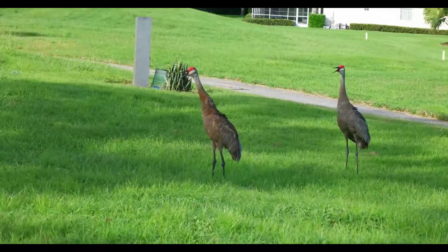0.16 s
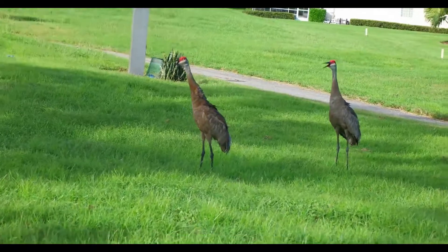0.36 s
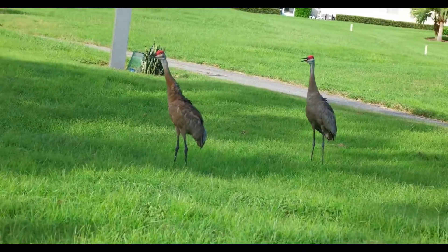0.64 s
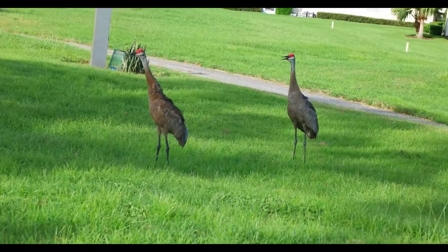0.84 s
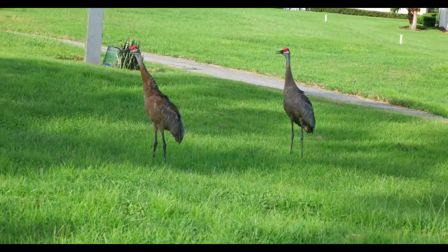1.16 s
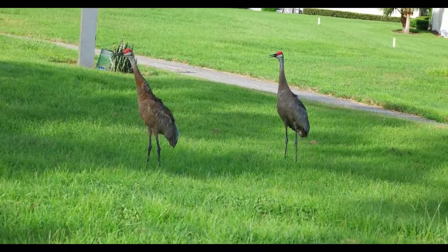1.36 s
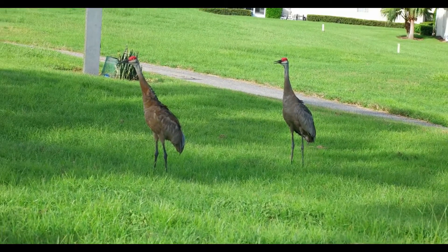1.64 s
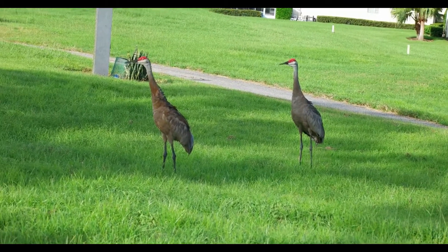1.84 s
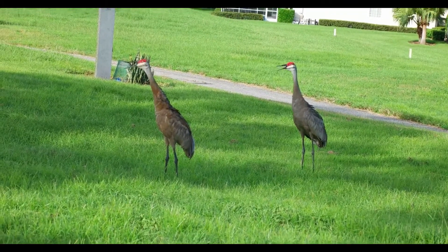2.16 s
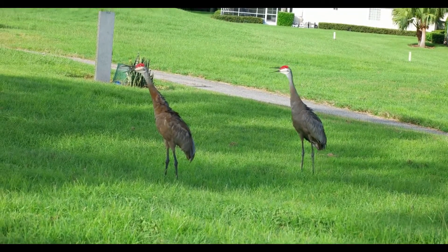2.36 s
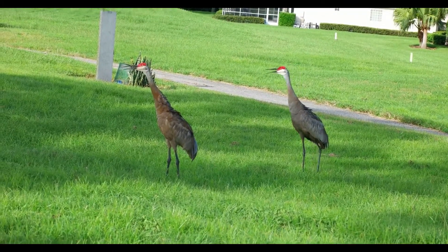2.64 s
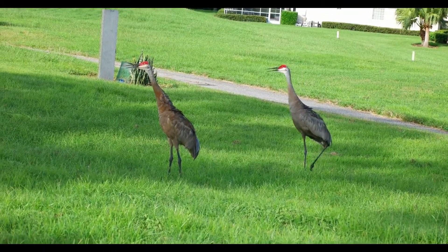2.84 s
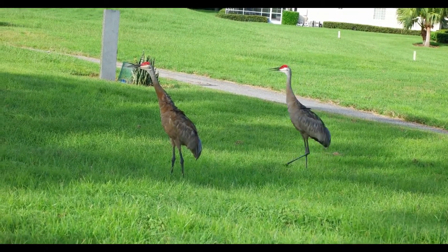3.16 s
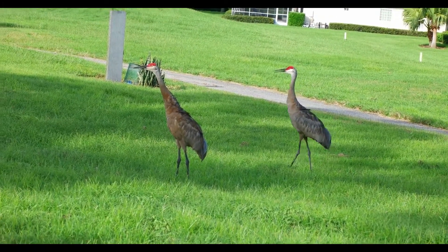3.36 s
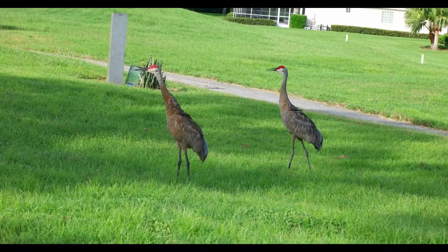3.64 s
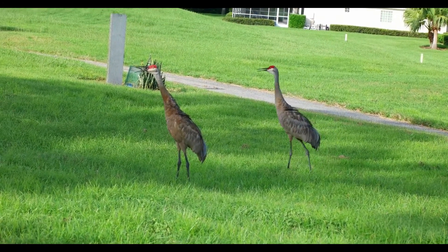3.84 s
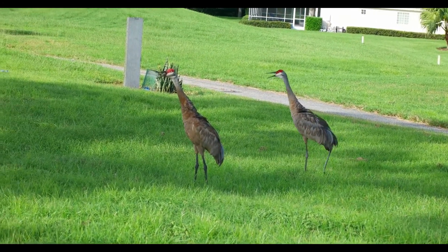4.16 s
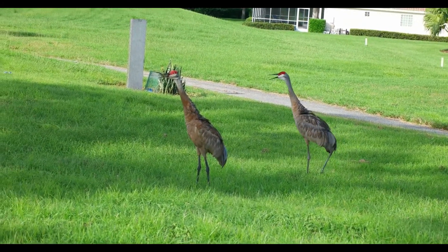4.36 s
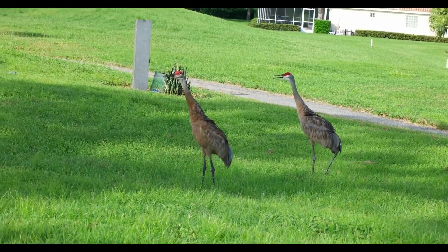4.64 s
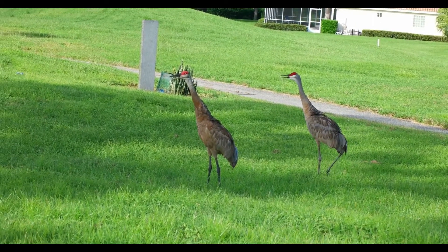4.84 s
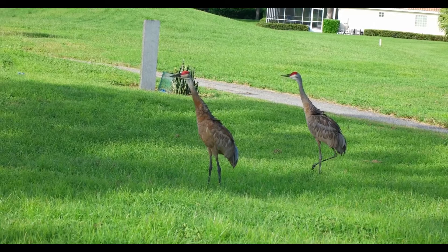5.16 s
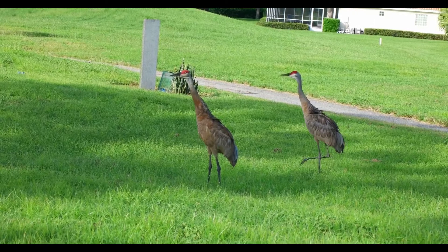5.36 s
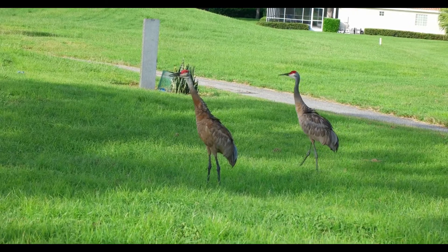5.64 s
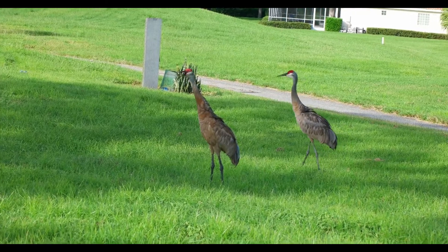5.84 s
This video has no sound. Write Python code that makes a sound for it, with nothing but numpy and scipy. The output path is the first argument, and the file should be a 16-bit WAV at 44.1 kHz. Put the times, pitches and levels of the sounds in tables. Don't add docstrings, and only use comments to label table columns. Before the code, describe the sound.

A stereo outdoor scene on a lawn between houses. At once a tiny rising honk is heard, then from 0.12 to 0.5 s a higher crane fires a very loud, hollow rattle of about eight pulses, roughly sixteen a second, resonant and breathy. A lower crane honks at 0.15 s and rattles from 0.27 to 0.7 s, interleaving. The first blows overload the microphone with a dull thud. A house echo swells and decays over soft broadband suburban rush; faint falling whistles come near 1.7 s. A leaping honk at 2.04 s opens the second duet, lasting to 2.85 s, with a distant slap echo. A thin high bird note sounds at 3.2 s. The third, weaker duet runs from 3.8 to 4.6 s. Two tiny distant calls come near 5.5 s, then a honk at 5.8 s and two fading high pulses from 5.92 s end it abruptly. Overall level steadily fades.

```python
import sys
import numpy as np
from scipy import signal
from scipy.fft import rfft, irfft, next_fast_len
from scipy.io import wavfile
from scipy.ndimage import uniform_filter1d, map_coordinates

SR = 44100
rng = np.random.default_rng(int(sys.argv[2]) if len(sys.argv) > 2 else 0)


def to_linear_factor(level_db):
    exponent = np.asarray(level_db, float) / 20
    return 10 ** exponent


def persist_wave(psi):
    counts = np.round(np.clip(psi, -1, 1) * 32767).astype(np.int16)
    wavfile.write(sys.argv[1], SR, np.atleast_2d(counts).T)


N = 264644
T = np.arange(N) / SR
FADE = 1 - T / 8.0


def unit(x):
    return x / np.sqrt(np.mean(x ** 2) + 1e-20)


def along(points, hz):
    f, v = np.transpose(points)
    return np.interp(np.log(hz + 1), np.log(f + 1), v)


def wobble(rate, size):
    knots = rng.standard_normal(int(size * rate / SR) + 4)
    return map_coordinates(knots, [np.arange(size) * rate / SR])


def resonance(f, center, width):
    return 1j * f * width / (center ** 2 - f * f + 1j * f * width)


def filtered(x, response):
    m = next_fast_len(N + SR // 2)
    return irfft(rfft(x, m) * response(np.fft.rfftfreq(m, 1 / SR)), m)[..., :N]


def add(track, s, x):
    part = track[max(round(s * SR), 0):][:len(x)]
    part += x[:len(part)]


# frequency in Hz, level in dB per Hz.
RUSH = [(12, -56), (20, -26), (53, -9), (230, -7), (264, -12), (476, -3), (548, -7), (858, -5), (1100, -11),
        (1500, -11), (10100, -31), (15000, -35), (16300, -47)]
# frequency in Hz, side minus mid level in dB.
RUSH_SIDE = [(60, -15), (150, -11), (380, -5), (950, -2), (2380, 0), (5980, 0), (15000, 0)]
# frequency in Hz, level in dB.
HUM = [(238, -71), (471, -67), (587, -70)]


def air():
    z = signal.stft(rng.standard_normal((2, N + 512)), nperseg=512)[2]
    patches = rng.standard_normal(z.shape[1:])
    patches = uniform_filter1d(uniform_filter1d(patches, 6, 0), 14, 1)
    pair = signal.istft(z * to_linear_factor(1.2 * unit(patches)), nperseg=512)[1][:, :N]
    mid, side = filtered(pair, lambda f: to_linear_factor(along(RUSH, f) + [0 * f, along(RUSH_SIDE, f)]))
    sway, drift = 2.5 * wobble(4, size=N), .6 * wobble(6, size=N)
    hum = sum(to_linear_factor(db + sway) * np.sin(2 * np.pi * hz * T + drift) for hz, db in HUM)
    earlier_echo_db = 9 * np.exp(-T / .25)
    level = to_linear_factor(-55.5 + earlier_echo_db + .7 * wobble(1.5, size=N)) / np.std(mid)
    return level * np.array([mid + side, mid - side]) + hum


# start in seconds, length in seconds, first pitch in Hz, last pitch in Hz, level in dB.
FAR_NOTES = [
    (1.65, .28, 3540, 3060, -71),
    (1.84, .14, 3420, 3190, -71),
    (3.24, .175, 7700, 8000, -78),
    (5.475, .075, 1010, 1150, -64),
    (5.545, .06, 775, 735, -65),
]
FAR_WAVER = [.005, .005, .03, .02, .02]


def far_birds():
    out = np.zeros(N)
    edge_db = 12
    for (s, length, first_hz, last_hz, db), waver in zip(FAR_NOTES, FAR_WAVER):
        u = np.linspace(0, 1, round(length * SR))
        glide = first_hz + (last_hz - first_hz) * u
        pitch = glide * (1 + waver * wobble(300, size=len(u)))
        level = db + 3 - edge_db * (2 * u - 1) ** 4 + 2.5 * wobble(40, size=len(u))
        add(out, s, to_linear_factor(level) * np.sin(2 * np.pi * np.cumsum(pitch) / SR))
    return out


def reverberation(x, start, length, decays, swell):
    hz, t, z = signal.stft(rng.standard_normal((2, round(length * SR))), SR, nperseg=256)
    envelope = (1 - np.exp(-t / swell)) * to_linear_factor(-60 * t / along(decays, hz)[:, None])
    tail = signal.istft(z * envelope, SR, nperseg=256)[1]
    tail = .5 * tail[:1] + .8 * tail
    delayed = np.pad(x, (round(start * SR), 0))[None]
    return signal.fftconvolve(delayed, tail / np.linalg.norm(tail[0]), axes=1)[:, :N]


def lawn(voices):
    return to_linear_factor(-30) * reverberation(voices, .008, .15, [(800, .12), (3000, .06)], swell=.003)


# frequency in Hz, gain in dB.
WALLS = [(400, -8), (650, 3), (850, -5), (1100, -1), (1400, 11), (2100, 4), (3000, 6), (6000, 8),
         (12000, 13)]
# frequency in Hz, t60 in seconds.
HOUSE_DECAY = [(300, .8), (900, 1.05), (3000, 1.15), (8000, .7), (15000, .5)]


def house_wash(voices):
    colored = filtered(voices, lambda f: to_linear_factor(along(WALLS, f)))
    return to_linear_factor(-28.5) * reverberation(colored, .08, 1.2, HOUSE_DECAY, swell=.2)


# frequency in Hz, gain in dB.
SLAP_COLOR = [(700, -30), (1100, -14), (2200, -1), (2900, 5), (5000, 2), (6500, -1), (10000, -26)]
# time in seconds, level in dB.
SLAP_LEVEL = [(.7, -37), (2.3, -22), (2.8, -31), (4.3, -20), (4.45, -30)]


def far_slap(low):
    toward_wall = low * to_linear_factor(np.interp(T, *np.transpose(SLAP_LEVEL)))
    colored = filtered(toward_wall, lambda f: to_linear_factor(along(SLAP_COLOR, f)))
    return reverberation(colored, .492, .02, [(1000, .015)], swell=.001)


# frequency in Hz, level in dB.
BREATH = [(500, -40), (1000, -4), (1300, -6), (1700, 0), (2400, 1), (2850, -12), (3400, -2), (4500, -2),
          (5300, -10), (6600, -8), (10000, -19), (16000, -42)]


def breath():
    return unit(filtered(rng.standard_normal(N), lambda f: to_linear_factor(along(BREATH, f))))


def voiced(hz, throat, envelope, steep, count=14):
    k = np.arange(1, count + 1)[:, None]
    phase = 2 * np.pi * (k * np.cumsum(hz) / SR + rng.random((count, 1)))
    swell = envelope ** (1 + steep * np.sqrt(k - 1))
    return np.sum(to_linear_factor(along(throat, k * hz)) * swell * np.sin(phase), axis=0)


def rattle(pulses, blow, rebound, throat):
    rise, hold, t60, sag, first, second, breath_db, away = blow
    gap_s, *rebound_db = rebound
    t = np.arange(SR // 60) / SR
    attack = np.sin(np.pi / 2 * np.clip(t / rise, 0, 1)) ** 1.5
    shape = attack * to_linear_factor(-60 * (np.maximum(t - rise - hold, 0) / t60) ** 2)
    gust = (1 - np.exp(-t / .0004)) * to_linear_factor(-60 * t / .023)
    arch = (1 - sag * ((t - .0045) / .004) ** 2).clip(.75, 1)
    tone, puff, rasp = np.zeros((3, N))
    times = np.transpose(pulses)[0]
    new_rattle = np.diff(times, prepend=-1) > .5
    into = times - np.maximum.accumulate(times * new_rattle)
    scatter = rng.standard_normal((len(pulses), 3))
    for (s, db, hz), tired_s, chance in zip(pulses, into, scatter):
        gap = gap_s + .0006 * chance[0]
        growth_db = tired_s * np.array(rebound_db[2:])
        first_db, second_db = np.minimum(rebound_db[:2] + growth_db + 1.5 * chance[1:], -1)
        add(tone, s, to_linear_factor(db - .3) * voiced(1.025 * hz * arch, throat, shape, steep=.35))
        add(puff, s, to_linear_factor(db + breath_db - away * s + 1.5) * gust)
        loose_beats = [(-.0055, .9, -26), (gap, first, first_db),
                       (2 * gap, second, second_db), (3 * gap, second, second_db - 12)]
        for lag, ratio, rel_db in loose_beats:
            pitch = hz * ratio * (1 + .05 * wobble(300, size=len(t)))
            beat = voiced(pitch, throat, shape, steep=.08, count=4)
            add(tone, s + lag, to_linear_factor(db - 2.5 + rel_db) * beat)
            rasp_db = db + .8 * rel_db + breath_db - 3
            add(rasp, s + lag, to_linear_factor(rasp_db) * gust * (lag > 0))
    dull_rasp = filtered(rasp * breath(), lambda f: .4 + 1.6 * resonance(f, 2000, 1800))
    return tone + puff * breath() + dull_rasp


# frequency in Hz, level in dB.
HONK_THROAT = [(550, -9), (780, 4), (1100, 1), (1450, -13), (1800, -8), (2200, -11), (2800, -26),
               (4000, -16), (6000, -33), (12000, -49)]


def honks(tables):
    out, hiss = np.zeros(N), breath()
    for rows in tables:
        s, hz, db, rough = np.transpose(rows)
        t = np.arange(s[0], s[-1], 1 / SR)
        rough = np.interp(t, s, rough)
        under_way = s[0] < .01
        edge = np.clip(np.minimum(t - s[0] + under_way, s[-1] - t) / .003, 0, 1)
        pitch = np.interp(t, s, hz) * (1 + .2 * rough * wobble(400, size=len(t)))
        voice = voiced(pitch, HONK_THROAT, np.ones(len(t)), steep=0)
        voice *= to_linear_factor(9 * rough * wobble(220, size=len(t)))
        voice += .25 * rough * hiss[max(round(s[0] * SR), 0):][:len(t)]
        add(out, s[0], edge * to_linear_factor(np.interp(t, s, db) + .5) * voice)
    return out


# frequency in Hz, width in Hz, level in dB.
WINDPIPE = [(850, 70, -9), (1060, 90, -16), (2200, 150, -14)]


def windpipe(voice):
    def response(f):
        ring = 1 + sum(to_linear_factor(db) * resonance(f, hz, width) for hz, width, db in WINDPIPE)
        return ring / (1 + (545 / (f + 1)) ** 8)
    return filtered(voice, response)


# start in seconds, length in seconds, peak level in dB.
LOW_HONKS = [
    (.145, .036, -20),
    (2.204, .03, -27),
    (4.032, .03, -33),
]


def low_honk(s, length, db):
    at = np.array([0, .6, 1]) * length
    level = db - np.array([4, 0, 4])
    hz = 566 - 1000 * at
    return np.transpose([s + at, hz, level, .28 + 0 * at])


# time in seconds, peak level in dB, pitch in Hz.
LOW_PULSES = [(0.269, -7, 864), (0.344, -6, 859), (0.411, -5, 892), (0.473, -5, 831), (0.534, -8, 827),
              (0.591, -6, 809), (0.648, -10, 751), (0.704, -25, 855), (2.331, -7, 871), (2.405, -6, 888),
              (2.471, -4, 949), (2.537, -11, 839), (2.599, -6, 852), (2.658, -7, 838), (2.715, -10, 872),
              (2.771, -11, 770), (2.835, -28, 892), (4.151, -11, 887), (4.227, -13, 882), (4.304, -14, 860),
              (4.36, -15, 850), (4.397, -35, 874), (4.422, -14, 934), (4.482, -11, 885), (4.541, -14, 790),
              (4.599, -26, 998)]
# rise in seconds, hold in seconds, t60 in seconds, pitch sag as a share, first and second
# rebound pitch ratio, breath in dB, breath loss in dB per second as the bird turns away.
LOW_BLOW = (.0025, .0015, .008, .02, .93, 1.16, -14, 1.8)
# gap in seconds, first and second level in dB, growth of each in dB per second of rattling.
LOW_REBOUND = (.0084, -10, -15, 9, 24)
# frequency in Hz, level in dB.
LOW_THROAT = [(500, -8), (850, 0), (1600, -17), (2400, -18), (2850, -32), (3400, -24), (4300, -25),
              (6000, -30), (9000, -36), (16000, -55)]


def low_crane():
    pulses = rattle(LOW_PULSES, LOW_BLOW, LOW_REBOUND, LOW_THROAT)
    return windpipe(pulses + honks([low_honk(*row) for row in LOW_HONKS]))


# time in seconds, pitch in Hz, level in dB, roughness from 0 to 1.
OPENING_HONKS = [
    [(0, 565, -29, .12), (.012, 575, -26, .1), (.026, 612, -21, .08), (.038, 605, -22, .15),
     (.047, 600, -33, .3), (.06, 600, -48, .2)],
]
# seconds after its start, pitch in Hz, level in dB,
# roughness from 0 to 1.
HONK_STEPS = [(0, 555, -22, .3), (.005, 552, -12, .3), (.015, 540, -12, .35), (.016, 645, -8, .4),
              (.027, 655, -7, .4), (.028, 760, -3, .3), (.049, 770, -4, .3), (.053, 830, -15, .15),
              (.066, 850, -34, .1)]
# start in seconds, level in dB.
STEP_STARTS = [
    (2.036, -17),
    (3.809, -20),
    (5.789, -25),
]
# time in seconds, peak level in dB, pitch in Hz.
HIGH_PULSES = [(0.12, 3, 1061), (0.187, -4, 1074), (0.249, -4, 1074), (0.307, -6, 1077), (0.362, -5, 1057),
               (0.415, -5, 1043), (0.463, -5, 1004), (0.515, -19, 792), (2.167, 1, 1052), (2.237, -5, 1067),
               (2.3, -7, 1068), (2.359, -7, 1081), (2.414, -6, 1008), (2.467, -8, 1029), (2.518, -10, 1040),
               (2.569, -8, 982), (3.939, -2, 1044), (4.009, -9, 1062), (4.072, -10, 1068),
               (4.132, -11, 1074), (4.189, -11, 1060), (4.242, -11, 1029), (4.294, -8.5, 964),
               (4.347, -22, 806), (5.918, -8, 1046), (5.985, -17, 1050)]
# seconds, seconds, seconds, share, ratio, ratio, dB, dB per second.
HIGH_BLOW = (.0024, .0022, .013, .03, .87, .84, -13, 0)
# seconds, dB, dB, dB per second, dB per second.
HIGH_REBOUND = (.0075, -3, -14, 2, 10)
# frequency in Hz, level in dB.
HIGH_THROAT = [(500, -12), (1050, 0), (1750, -19), (2200, -12), (2750, -34), (3300, -19), (4400, -21),
               (5500, -32), (6600, -24), (9000, -33), (16000, -52)]


def high_crane():
    stepped = [np.add(HONK_STEPS, [s, 0, db, 0]) for s, db in STEP_STARTS]
    pulses = rattle(HIGH_PULSES, HIGH_BLOW, HIGH_REBOUND, HIGH_THROAT)
    return windpipe(pulses + honks(OPENING_HONKS + stepped))


def heard(x, pan, lead):
    side = np.array([[.5], [-.5]])
    return filtered(x, lambda f: to_linear_factor(side * along(pan, f)) * np.exp(1j * side * along(lead, f)))


# frequency in Hz, left minus right in dB.
HIGH_PAN = [(500, -2), (1050, 0), (2200, .3), (5000, -4), (15000, -2)]
LOW_PAN = [(500, -2), (850, -2), (1650, .8), (5000, -2), (15000, -2)]
# frequency in Hz, lead of the left in radians.
HIGH_LEAD = [(900, .12), (1500, .1), (2500, -.4), (4600, -1.3), (7000, -1.5), (15000, -1.3)]
LOW_LEAD = [(900, .15), (1500, .1), (2300, -.3), (3500, -1.5), (7800, -1.8), (15000, -1.5)]


def scene():
    high, low = high_crane(), low_crane()
    background = far_birds() + FADE ** 1.15 * air()
    echoes = lawn(high + low) + house_wash(high + low) + far_slap(low)
    direct = heard(high, HIGH_PAN, HIGH_LEAD) + heard(low, LOW_PAN, LOW_LEAD)
    return direct + echoes + background


def roll_off(x):
    return signal.sosfilt(signal.butter(12, 16470, fs=SR, output="sos"), x)


def record(dry):
    ceiling = .92 * FADE
    excess = dry - dry / (1 + np.abs(dry / ceiling) ** 14) ** (1 / 14)
    thud = filtered(excess ** 2 / ceiling, lambda f: resonance(f, 185, 170) ** 3)
    shaved = filtered(excess, lambda f: 1 / (1 + (130 / (f + 1)) ** 4))
    mix = dry - shaved + to_linear_factor(4) * FADE ** 1.3 * thud
    return roll_off(filtered(mix, lambda f: f < 16400))


dry = scene()
out = record(dry)
persist_wave(out)
```